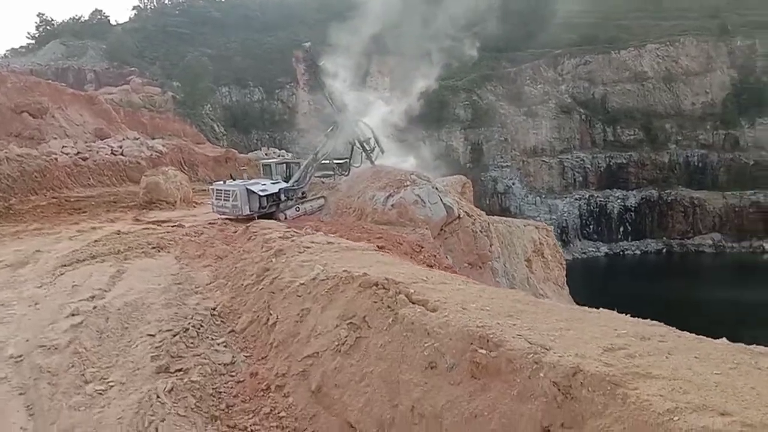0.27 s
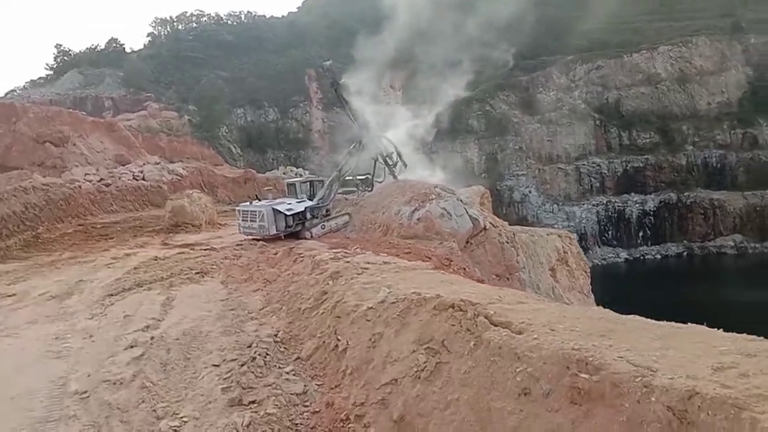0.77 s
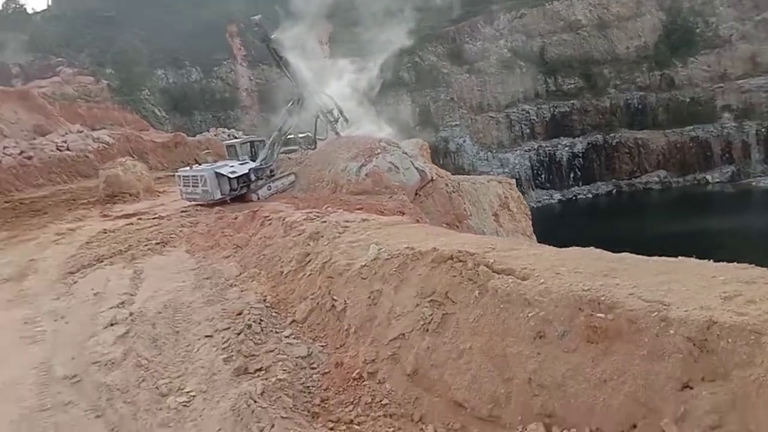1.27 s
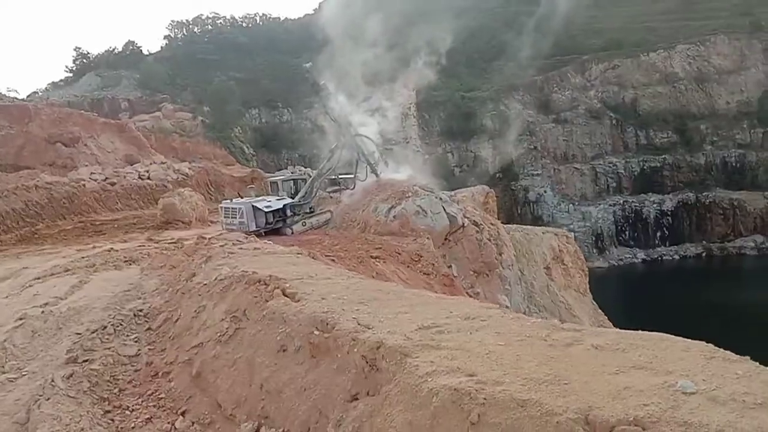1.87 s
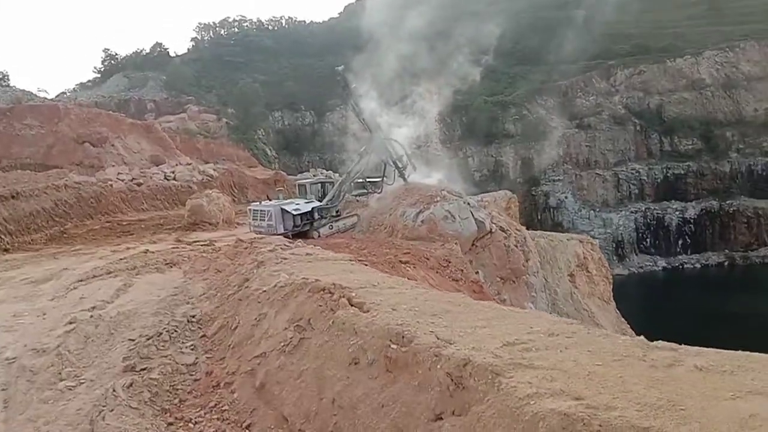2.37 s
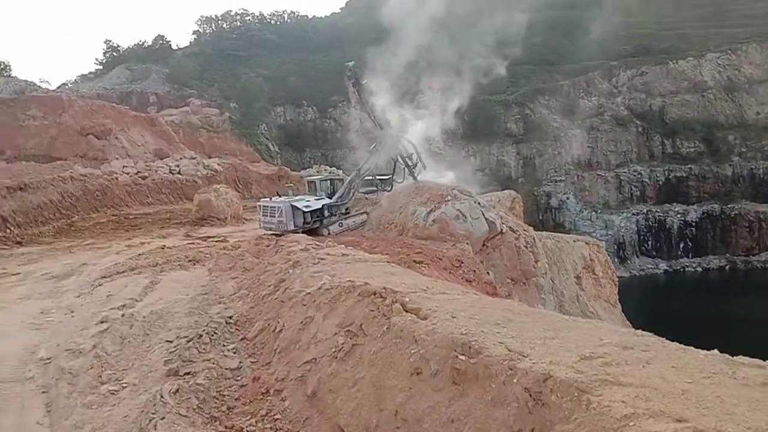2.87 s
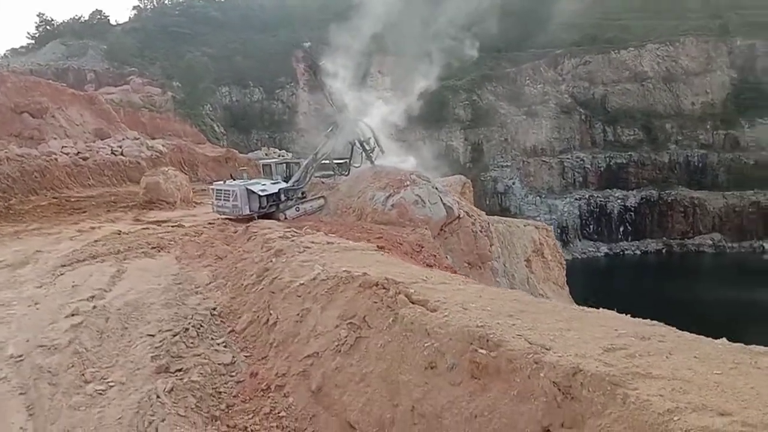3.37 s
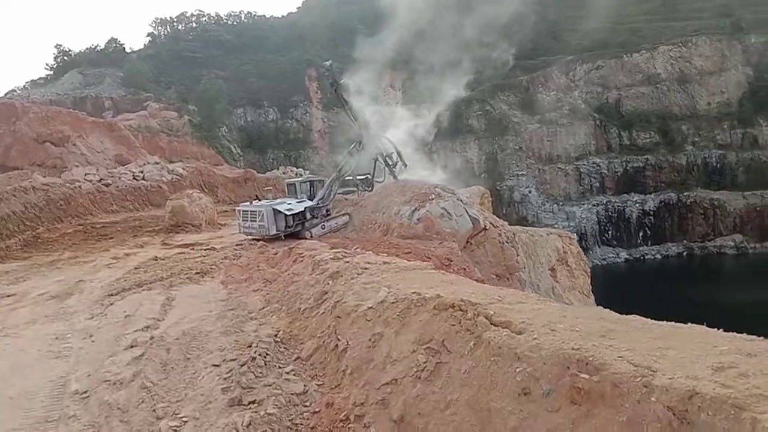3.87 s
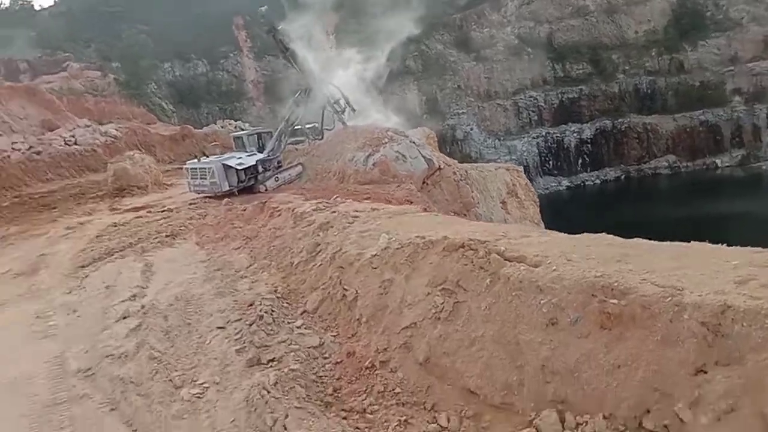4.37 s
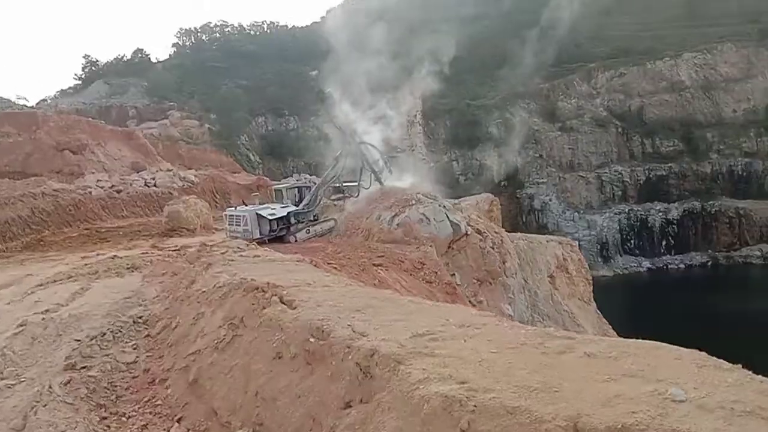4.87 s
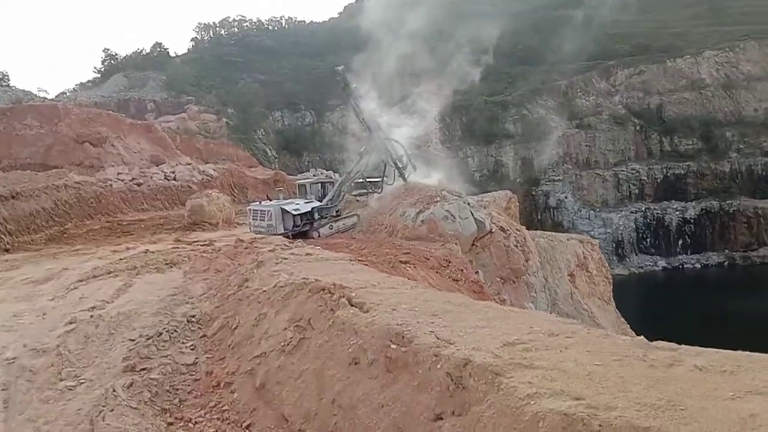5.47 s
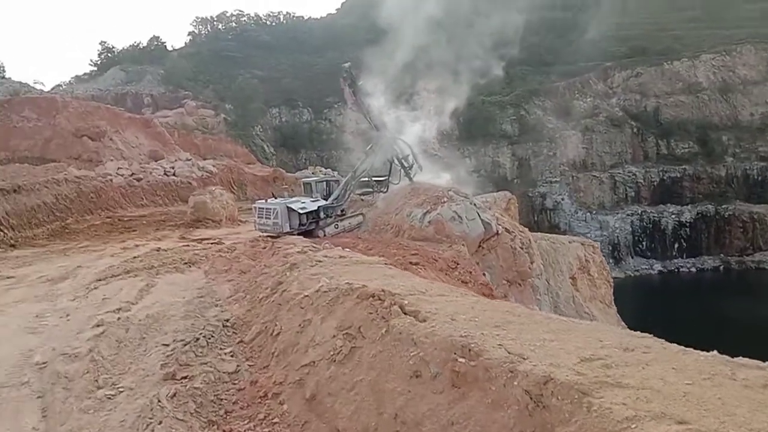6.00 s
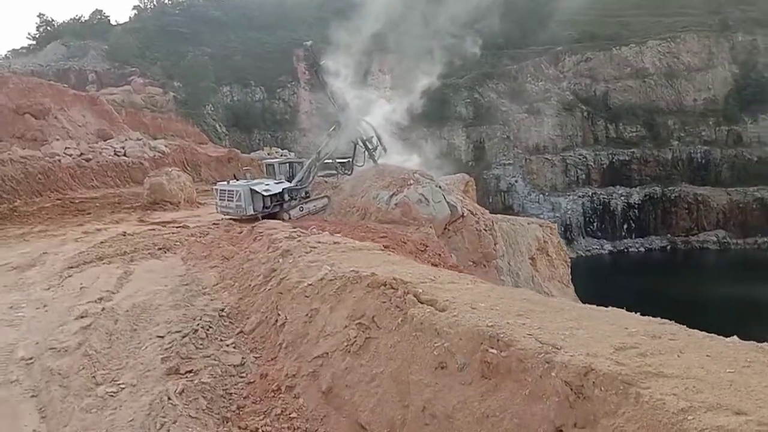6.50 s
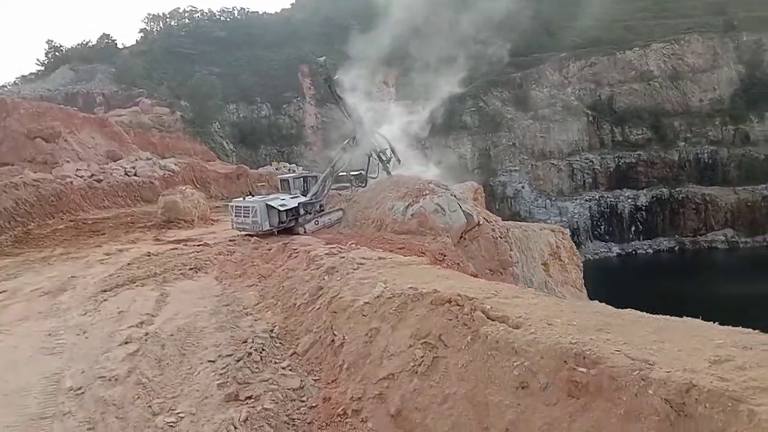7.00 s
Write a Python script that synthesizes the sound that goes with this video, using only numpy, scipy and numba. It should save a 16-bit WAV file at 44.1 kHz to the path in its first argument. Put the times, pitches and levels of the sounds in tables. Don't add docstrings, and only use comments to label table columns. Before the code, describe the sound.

Outdoor quarry, a tracked rock drill at some distance, picked up by a handheld phone. From 0 s a diesel rumbles and throbs with fast irregular knocks and a faint gear whine, while hammering at about 36 blows a second rings a long steel rod: thin, bright, fluttering metallic tones over rock grinding and hissing air. Near 0.9 s flushing air bursts out with a bump or two, a harsh jet and lower gush that brightens, with sliding resonance and rattling metal; it is chopped at 1.5 s. After a tiny gap the take fades in over 0.3 s. Finger taps hit around 2.0 and 2.1 s, the second big, with a brief dip. Drilling runs steadily until the blast at 4.0 s, with hard thumps at 4.1 to 4.2 s, cut at 4.6 s. It fades in again, thumps near 5.1 s, and drills on until just about the next blast at 7.1 s.

```python
import sys
import numpy as np
from scipy import signal
from scipy.fft import rfft, irfft, next_fast_len
from scipy.io import wavfile
from scipy.ndimage import uniform_filter1d
from numba import njit

SR = 44100
rng = np.random.default_rng(int(sys.argv[2]) if len(sys.argv) > 2 else 0)


def convert_level_to_amplitude(level_db):
    exponent = np.asarray(level_db, float) / 20
    return 10 ** exponent


def pcm_store(signal):
    levels = np.round(np.clip(np.atleast_2d(signal), -1, 1) * 32767)
    wavfile.write(sys.argv[1], SR, levels.astype(np.int16).T)


N = 319284
T = np.arange(N) / SR
FIRING_HZ = 72.7
START_S, CUT_S = 1.540, 4.5695
FADE_FROM_S, FADE_S = 1.528, 0.3
VALVE_S = 3.995


# (frequency [Hz], width [Hz], level [dB])
ROD_MODES = [(2232, 24, -12), (2455, 26, -13), (2692, 26, -14), (2942, 45, -17), (3150, 50, -19),
             (3478, 26, -10), (4013, 30, -8), (4200, 40, -9), (4295, 70, -5), (4612, 36, -10),
             (4895, 28, -7), (5183, 24, -8), (5472, 70, -8), (5770, 60, -12), (6050, 50, -17),
             (6340, 45, -19), (6640, 45, -16), (6960, 36, -20), (7287, 36, -19), (7970, 35, -33),
             (11290, 45, -27), (11610, 45, -26), (14560, 90, -32)]
# (frequency [Hz], density [dB per Hz])
FLUSH_SPECTRUM = [(1940, -27), (3300, -11.5), (3540, -29), (3650, 2.5), (3870, 0.5), (3970, 3), (4170, -2),
                  (4610, 0), (5580, 3), (6330, -9.5), (6770, -13), (7540, -50), (8000, -23), (10400, -54),
                  (17600, -120)]
# (frequency [Hz], density [dB per Hz])
GRIND_SPECTRUM = [(850, -33), (1450, -15), (1500, -4), (1650, 1.5), (2040, -9.5), (2260, -8.5),
                  (2800, -13.5), (3400, -22.5), (4420, -50), (7480, -120)]
# (frequency [Hz], density [dB per Hz])
HOOD_SPECTRUM = [(4470, -3), (7600, 2), (7950, -31), (8270, -13), (8570, 1), (8830, 3), (9790, -6.5),
                 (10200, -0.5), (10700, 7), (11100, -11), (11700, 1.5), (12400, -4), (13600, -11),
                 (14900, -7), (15600, -12)]
# (time [s], level [dB])
FEED_PRESSURE = [(1.8, -34.5), (2.14, -36), (2.4, -32), (2.68, -35.5), (3.05, -33), (3.2, -34), (3.52, -38),
                 (3.68, -35.5), (3.9, -34.5)]


def drill(hammer):
    feed_db = curves(FEED_PRESSURE)[0]
    grind_db = np.minimum(-44.5 + 2.5 * (T - START_S), -34)
    hood_db = -52 + 0.1 * (feed_db - feed_db.mean())
    rod = ring(1.2 + hammer, ROD_MODES, fade_db=2.2, fade_rate=12)

    flush_gusts = convert_level_to_amplitude(1.1 * walk(22))
    flush = colour((5 + hammer) * flush_gusts * rng.standard_normal(N), FLUSH_SPECTRUM)
    flush = patchy(flush, [4300, 5300, 5400, 7000], depth_db=-3.0, rate=6.8)

    bite = convert_level_to_amplitude(1.0 * walk(22))
    grind = colour((2.6 + hammer) * bite * rng.standard_normal(N), GRIND_SPECTRUM)

    hood_gusts = convert_level_to_amplitude(1.5 * walk(12))
    hood = colour((1.3 + hammer) * hood_gusts * rng.standard_normal(N), HOOD_SPECTRUM)
    hood = patchy(hood, [8850, 10100, 11800, 14400], depth_db=0.0, rate=5.09)

    treble = convert_level_to_amplitude(-4) * rod + convert_level_to_amplitude(-4.3) * flush
    drilling = convert_level_to_amplitude(feed_db) * treble + convert_level_to_amplitude(grind_db) * grind
    fade = ramp(FADE_FROM_S, FADE_S)
    return fade ** 1.16 * drilling + fade ** 1.2 * convert_level_to_amplitude(hood_db) * hood


# (time [s], peak [dB], rise [s], fall [s])
SINGING_SWELLS = [(1.72, -44.5, 0.14, 0.091), (2.03, -37.5, 0.085, 0.13), (2.49, -37, 0.14, 0.1),
                  (2.78, -34.5, 0.087, 0.11), (3.16, -45.5, 0.12, 0.16), (3.53, -43.5, 0.02, 0.054),
                  (4.05, -34.5, 0.048, 0.082), (4.24, -26, 0.07, .1), (4.5, -33.5, 0.035, 0.09)]


def singing(hammer):
    tone = np.sin(2 * np.pi * 3743 * T + 1.5 * walk(30))
    gain = (convert_level_to_amplitude(-52.5) + swells(SINGING_SWELLS)) * ramp(FADE_FROM_S, FADE_S) ** 0.67
    return gain * convert_level_to_amplitude(3.2 * walk(30)) * tone * (1 + 0.4 * hammer)


# (frequency [Hz], density [dB per Hz])
JET_SPECTRUM = [(1940, -40), (3300, -5.5), (3520, -9), (3880, -1.5), (4570, -11), (5550, -11.5),
                (6040, -12.5), (7200, -11.5), (8140, -26.5), (8810, -19), (9770, -23), (10600, -13.5),
                (13400, -25), (14800, -13.5), (15600, -42)]
# (frequency [Hz], density [dB per Hz])
GUSH_SPECTRUM = [(820, -7.5), (1400, -4.5), (1520, -1.5), (1650, -2.5), (2130, -3.5), (2660, -2.5),
                 (3400, -4), (4420, -55), (7480, -120)]
# (frequency [Hz], width [Hz], level [dB])
BARE_ROD_MODES = [(1600, 50, -8), (1750, 50, -6), (2010, 40, -11), (2232, 26, -2), (2450, 30, -7),
                  (2615, 30, -8), (2695, 32, -3), (2944, 45, -7), (3478, 24, -2), (4012, 32, -4),
                  (4290, 60, -9), (4895, 30, -11), (5470, 45, -14), (6640, 45, -15), (7285, 33, -15),
                  (8840, 68, -18), (10550, 90, -18), (11600, 50, -20), (14560, 60, -17)]
# (time [s], centre [Hz])
THROAT_SLIDE = [(4.04, 1640), (4.08, 1630), (4.17, 2540), (4.25, 2900), (4.4, 2850), (4.44, 3000),
                (4.57, 2580)]
COLLAR_PARTIALS = [3112, 3148, 3202, 3230]
# (time [s], peak [dB], rise [s], fall [s])
JET_SURGES = [(4.4, -41, 0.034, 0.015), (4.57, -48, 0.014, .04)]
GUSH_SURGES = [(4.108, -27, 0.012, 0.035), (4.49, -37, 0.024, 0.01)]
THROAT_SURGES = [(4.17, -33, 0.08, 0.032), (4.45, -29.5, 0.077, 0.082)]
COLLAR_SURGES = [(4.25, -24.5, 0.066, 0.18), (4.14, -30, 0.014, .02)]


def blast():
    throat_hz = curves(THROAT_SLIDE)[0]
    gush_db = np.minimum(-29.5 + 23 * np.maximum(T - 4.22, 0), -24.5)
    rattle = beats(36.4, 4.7, [0], scatter_db=2.0, jitter_s=0.0019, decay_s=0.0051)
    jet = colour(convert_level_to_amplitude(1.0 * walk(24.78)) * rng.standard_normal(N), JET_SPECTRUM)
    gush = colour(convert_level_to_amplitude(1.8 * walk(29.9)) * rng.standard_normal(N), GUSH_SPECTRUM)
    rod = ring(1.2 + rattle, BARE_ROD_MODES, fade_db=2.4, fade_rate=14)
    throat = 2.07 * svf(rod, throat_hz, 380.0)

    chime = sum(np.sin(2 * np.pi * hz * T + 1.5 * walk(30)) for hz in COLLAR_PARTIALS)
    scrape = unit(svf(rng.standard_normal(N), np.full(N, 3170.), 200.))
    collar = unit((1.8 + rattle) * (chime + 0.9 * scrape))

    jet = jet - above(jet, 7600) * (1 - ramp(3.973, 0.2))
    jet = patchy(jet, [4270, 5200, 6300, 7550, 9000, 10600, 12600, 14600], depth_db=2.0, rate=13)
    open_hole = jet + convert_level_to_amplitude(-3) * rod

    gush = gush - above(gush, 2300) * (1 - ramp(4.08, 0.067))
    clearing = ramp(4.03, 0.034) ** 2
    gush = clearing * (convert_level_to_amplitude(gush_db) + swells(GUSH_SURGES)) * gush

    parts = (convert_level_to_amplitude(-30) + swells(JET_SURGES)) * open_hole
    parts = parts + (convert_level_to_amplitude(-39) + swells(THROAT_SURGES)) * throat
    parts = parts + (convert_level_to_amplitude(-40) + swells(COLLAR_SURGES)) * collar
    return ramp(VALVE_S, 0.036) ** 2 * parts + gush


# (frequency [Hz], density [dB per Hz])
RUMBLE_SPECTRUM = [(15, -66), (25, -22), (54, -20), (118, -2.5), (190, -3), (253, -6), (286, -6), (460, -9),
                   (521, -10), (559, -11), (600, -12.5), (839, -12), (1090, -14), (1240, -10),
                   (1700, -30.5), (2210, -31.5), (3740, -120)]
# (frequency [Hz], width [Hz], level [dB])
PIPE_MODES = [(69.5, 18.5, -5), (111.9, 24.7, 0), (166.8, 26, -4), (248.1, 32, -4), (381.2, 34.5, -8),
              (467, 37, -9), (771, 54, -18.5)]
# (frequency [Hz], rms level [dB])
GEAR_WHINES = [(562, -39.5), (1404, -56.5)]
CYLINDER_STRENGTHS = [0, -3, -1, -2, 0, -4]
# (time [s], peak [dB])
HARD_BURNS = [(1.8776, -37), (2.265, -10.5), (2.346, -16), (2.4863, -19), (2.9237, -18), (2.9833, -20),
              (3.023, -21), (3.091, -15.5), (3.2044, -24), (3.5503, -22), (3.596, -11), (3.791, -12),
              (4.0627, -11), (4.101, -10), (4.472, -16)]
# (time [s], knock boost [dB])
ENGINE_LOAD = [(1.9, 0), (2.05, -2.7), (2.41, 3), (2.68, -4), (3.12, 3), (3.28, 0), (3.5, 3.5), (3.66, 0.8),
               (3.78, 3), (3.9, 0), (4.03, 3.2), (4.16, -0.5), (4.4, 3.5), (4.56, 2)]


def diesel():
    load_db = curves(ENGINE_LOAD)[0]
    fade = ramp(FADE_FROM_S, FADE_S)
    rumble_db = -20 + 0.043 * load_db - 5 * ramp(VALVE_S, 0.25)
    throb = beats(FIRING_HZ / 3, 0, [0, -2], scatter_db=4.5, jitter_s=0.0022, decay_s=0.0064)
    burn = beats(FIRING_HZ, 2.9565, CYLINDER_STRENGTHS, scatter_db=2.4, jitter_s=0.0009, decay_s=0.0024)
    rumble = colour((1 + 0.096 * throb + 0.053 * burn) * rng.standard_normal(N), RUMBLE_SPECTRUM)
    pipes = ring(1 + 0.19 * throb, PIPE_MODES, fade_db=1, fade_rate=3.69)

    cover_hz = np.full(N, 1265.)
    hum = svf(rng.standard_normal(N), cover_hz, 154.0)
    hum = unit(svf(hum, cover_hz, 154.0))
    carrier = np.sin(2 * np.pi * cover_hz * T + 1.62 * walk(60))
    knock = unit(hum + 1.5 * burn * carrier)
    s, db = np.transpose(HARD_BURNS)
    hard_knocks = puffs(s, db - 5.5, decay_s=0.0016) * carrier

    gears = np.zeros(N)
    for hz, db in GEAR_WHINES:
        whine_gain = convert_level_to_amplitude(db + 22.5 + 2 * walk(8))
        gears += whine_gain * np.sin(2 * np.pi * hz * T + 1.4 * walk(6))

    body = convert_level_to_amplitude(rumble_db) * fade * (convert_level_to_amplitude(-1.5) * rumble + convert_level_to_amplitude(-5) * pipes + gears)
    return body + convert_level_to_amplitude(-28.5 + load_db - 1.5) * fade ** 1.4 * knock + hard_knocks


# (time [s], signed peak [full scale], ring [Hz], ring decay [s], edge decay [s])
FINGER_BUMPS = [
    (1.555, 0.08, 100, 0.02, .0012),
    (2.0156, 0.33, 203, 0.0052, 0.0003),
    (2.1011, .648, 93, 0.011, 0.00089),
    (3.99, .17, 300, 0.003, 0.00047),
    (4.1051, -.7, 298, 0.0041, 0.0003),
    (4.168, -0.39, 142, 0.021, 0.00042),
]


def bumps():
    out = np.zeros(N)
    for s, peak, hz, ring_s, edge_s in FINGER_BUMPS:
        t = np.maximum(T - s, 0)
        rise = 1 - np.exp(-(t / 0.0001) ** 2)
        push = np.exp(-t / edge_s)
        swing = 0.61 * np.exp(-t / ring_s) * np.cos(2 * np.pi * hz * t + 0.48)
        out += peak * rise * (push + swing)
    return out


def beats(hz, one_s, pattern_db, scatter_db, jitter_s, decay_s):
    count = int(N / SR * hz)
    chance = rng.standard_normal((count, 2))
    first_s = (one_s - decay_s) % (1 / hz)
    s = first_s + np.arange(count) / hz + jitter_s * chance[:, 0]
    db = np.resize(pattern_db, count) + scatter_db * chance[:, 1]
    return unit(puffs(s, db, decay_s))


def puffs(s, db, decay_s):
    x = np.zeros(N)
    x[np.clip((s * SR).astype(int), 0, N - 1)] = convert_level_to_amplitude(db)
    pole = np.exp(-1 / (decay_s * SR))
    return signal.lfilter([np.e * (1 - pole)], [1, -2 * pole, pole ** 2], x)


def ring(drive, modes, fade_db, fade_rate):
    out = 0
    for hz, width, db in modes:
        peak = np.concatenate(signal.iirpeak(hz, hz / width, SR))
        mode = signal.sosfilt([peak, peak], drive * rng.standard_normal(N))
        out = out + convert_level_to_amplitude(db + fade_db * walk(fade_rate)) * mode
    return unit(out)


@njit
def svf(x, hz, width):
    y, band, low = np.empty(len(x)), 0., 0.
    for i in range(len(x)):
        g, k = np.tan(np.pi * hz[i] / SR), width / hz[i]
        v = (band + g * (x[i] - low)) / (1 + g * (g + k))
        band, low, y[i] = 2 * v - band, low + 2 * g * v, k * v
    return y


def patchy(x, centres_hz, depth_db, rate):
    out = x
    for hz in centres_hz:
        band = svf(x, np.full(N, 1. * hz), hz / 6)
        out = out + band * (convert_level_to_amplitude(depth_db * walk(rate)) - 1)
    return unit(out)


def colour(x, points):
    hz, db = np.transpose(points)
    size = next_fast_len(N)
    f = np.maximum(np.arange(size // 2 + 1) * SR / size, 1)
    gain = convert_level_to_amplitude(np.interp(np.log(f), np.log(hz), db, left=-90, right=-90))
    return unit(irfft(rfft(x, size) * gain, size)[:N])


def above(x, hz):
    return signal.sosfiltfilt(signal.butter(2, hz, "high", fs=SR, output="sos"), x)


def walk(rate):
    k = int(SR / rate)
    steps = np.repeat(rng.standard_normal(N // k + 1), k)
    return 1.37 * uniform_filter1d(uniform_filter1d(steps, k), k)[:N]


def swells(rows):
    gain = 0
    for s, db, rise_s, fall_s in rows:
        width_s = np.where(T < s, rise_s, fall_s)
        gain = gain + convert_level_to_amplitude(db) * np.exp(-((T - s) / width_s) ** 2)
    return gain


def ramp(from_s, rise_s):
    return np.clip((T - from_s) / rise_s, 0, 1)


def curves(rows):
    s, *columns = np.transpose(rows)
    return [np.interp(T, s, c) for c in columns]


def unit(x):
    return x / np.sqrt(np.mean(x ** 2))


# (time [s], level [dB])
KNOCK_DUCK = [
    (2.082, 0),
    (2.086, -11),
    (2.122, -8),
    (2.13, 0),
]
# (from [s], offset to the same moment of the shot [samples])
REPLAYS = [
    (0, 136407),
    (.67, 135383),
    (1.52, 0),
    (4.59, -135377),
    (6.83, -136401),
]


def scene():
    hammer = beats(FIRING_HZ / 2, 2.958, [0], scatter_db=2.5, jitter_s=0.0002, decay_s=0.0048)
    duck_db = curves(KNOCK_DUCK)[0]
    treble = drill(hammer) + singing(hammer) + blast()
    shot = diesel() * convert_level_to_amplitude(duck_db) + treble * convert_level_to_amplitude(0.5 * duck_db) + bumps()

    shot *= ramp(START_S, 0.002) * convert_level_to_amplitude(-5.5 * (1 - ramp(1.578, 0.003)))
    shot *= np.where(T < CUT_S, 1, convert_level_to_amplitude(-40 - 9000 * (T - CUT_S)))

    piece = np.searchsorted([s for s, _ in REPLAYS], T, side="right") - 1
    out = np.zeros(N)
    for k, (_, lag) in enumerate(REPLAYS):
        splice = uniform_filter1d(1. * (piece == k), size=int(0.004 * SR))
        out += splice * np.roll(shot, -lag)
    return out[None]


def band_limit(x):
    return signal.sosfilt(signal.butter(12, 16610, fs=SR, output="sos"), x)


def record(dry):
    top = signal.ellip(10, 0.2, 60, 15480, fs=SR, output="sos")
    bass = signal.butter(2, 40, "high", fs=SR, output="sos")
    mix = signal.sosfilt(np.vstack([top, bass]), dry)
    return band_limit(mix)


dry = scene()
out = record(dry)
pcm_store(out)
```